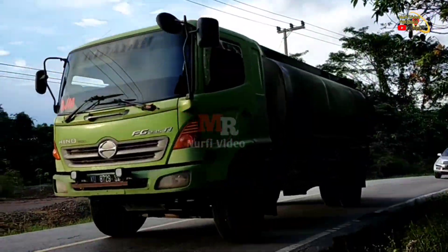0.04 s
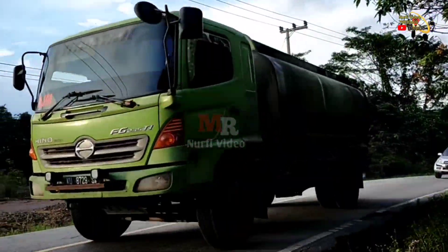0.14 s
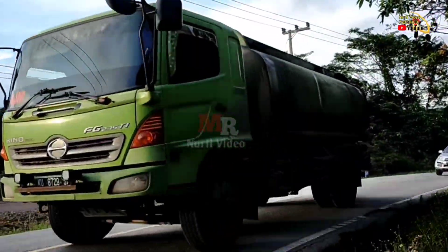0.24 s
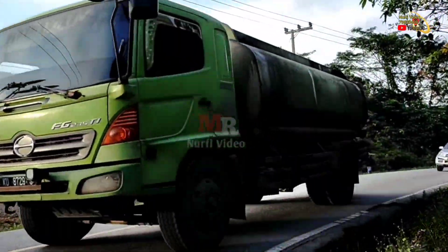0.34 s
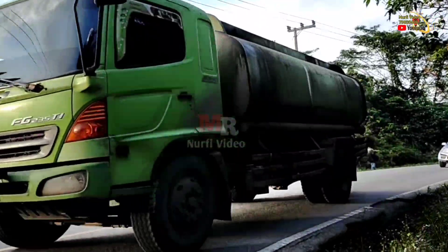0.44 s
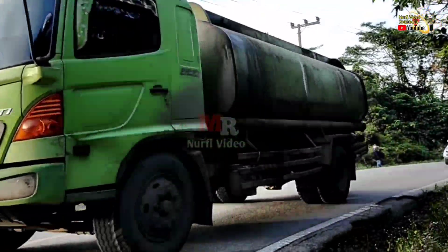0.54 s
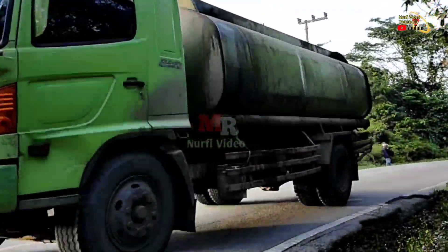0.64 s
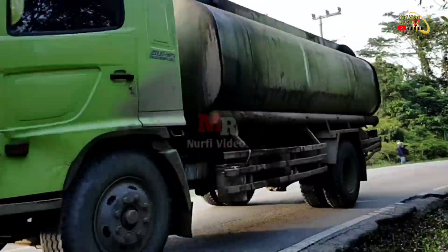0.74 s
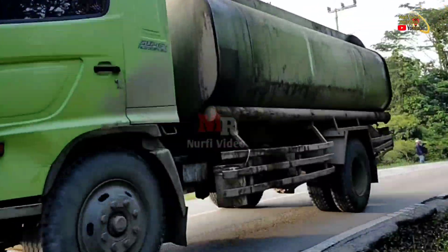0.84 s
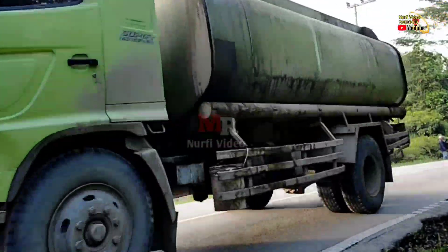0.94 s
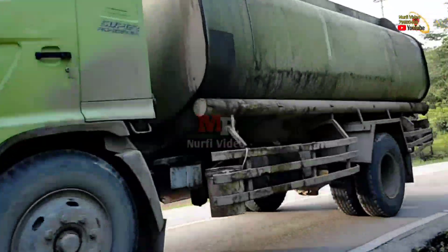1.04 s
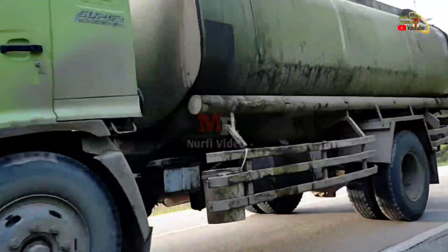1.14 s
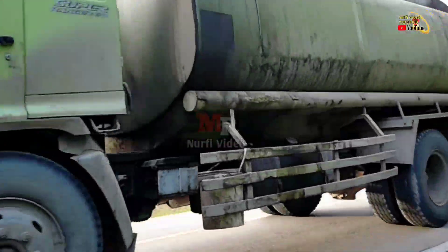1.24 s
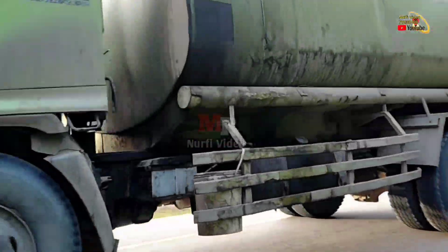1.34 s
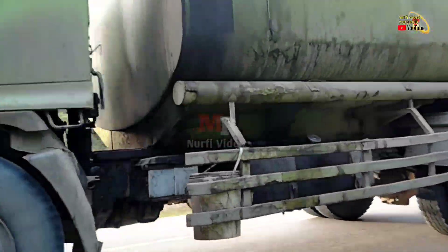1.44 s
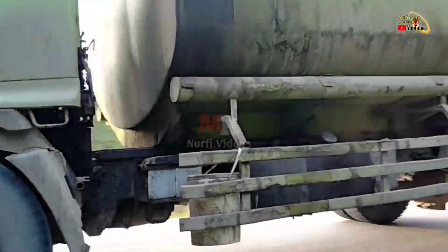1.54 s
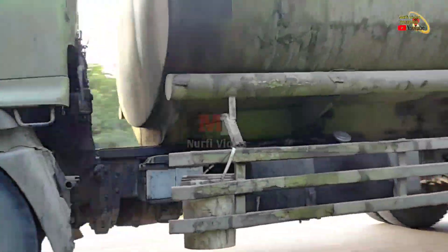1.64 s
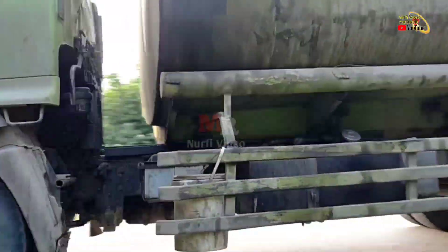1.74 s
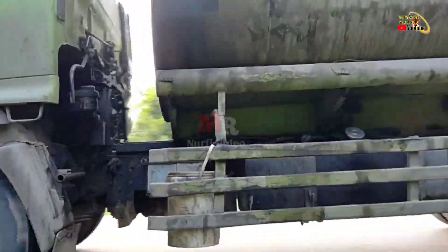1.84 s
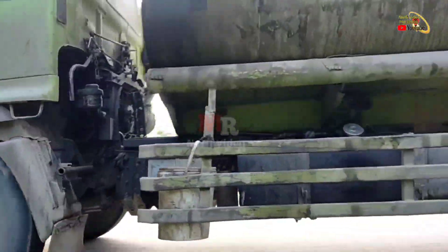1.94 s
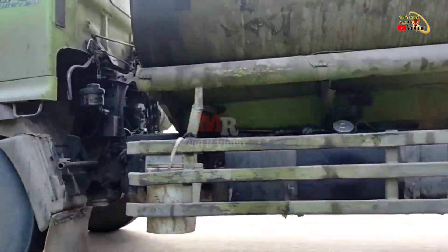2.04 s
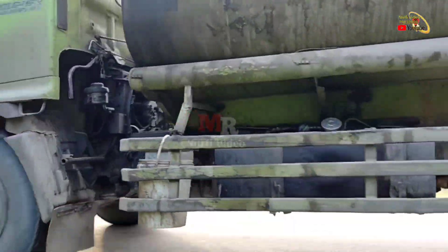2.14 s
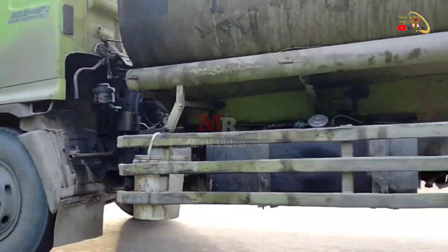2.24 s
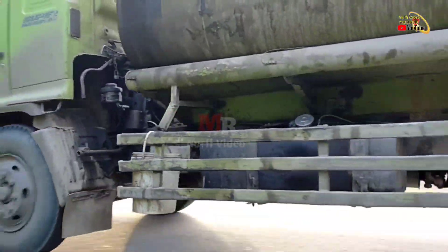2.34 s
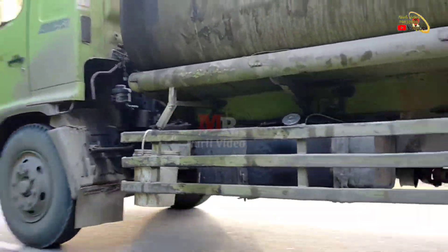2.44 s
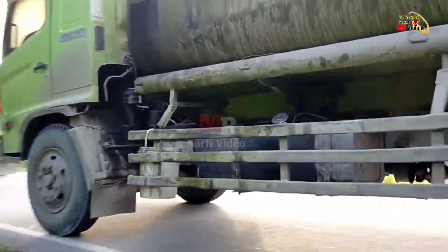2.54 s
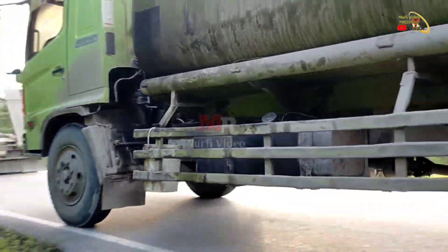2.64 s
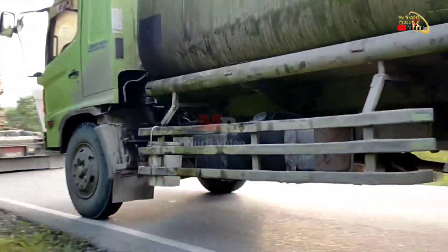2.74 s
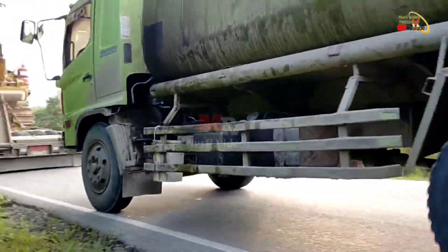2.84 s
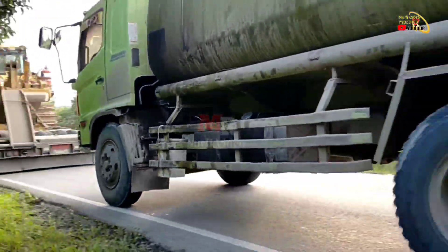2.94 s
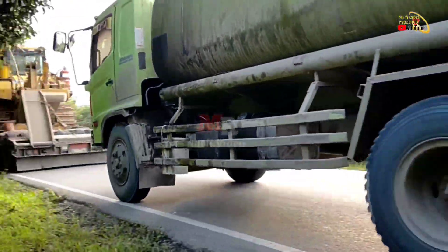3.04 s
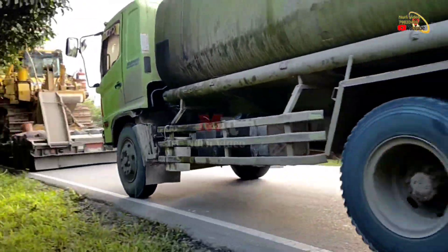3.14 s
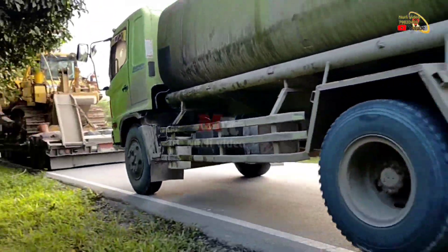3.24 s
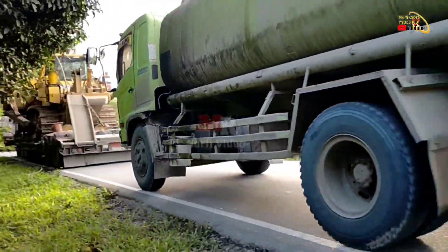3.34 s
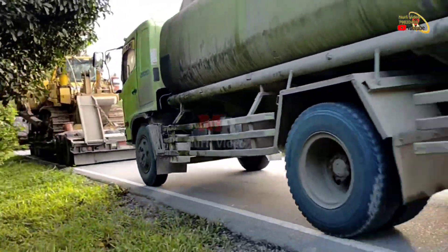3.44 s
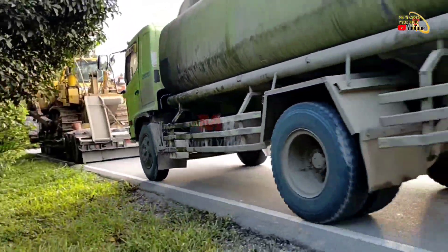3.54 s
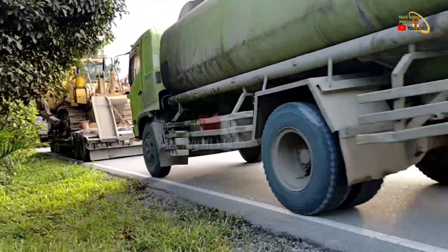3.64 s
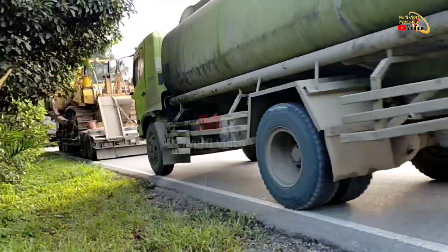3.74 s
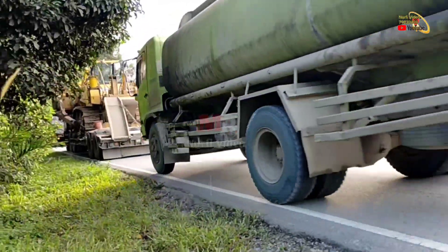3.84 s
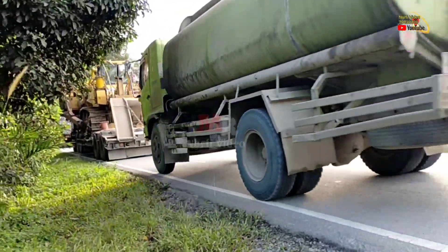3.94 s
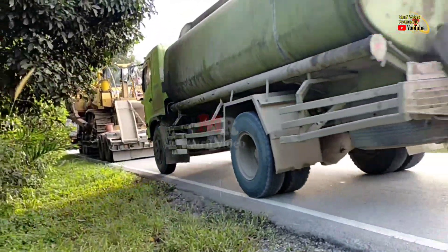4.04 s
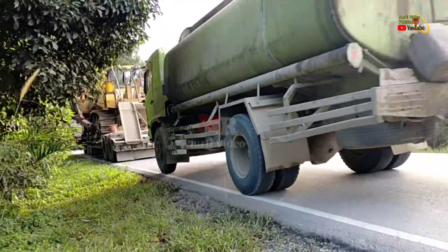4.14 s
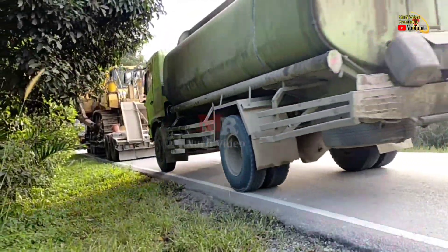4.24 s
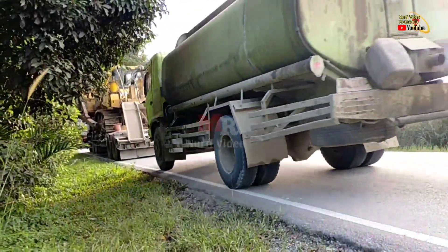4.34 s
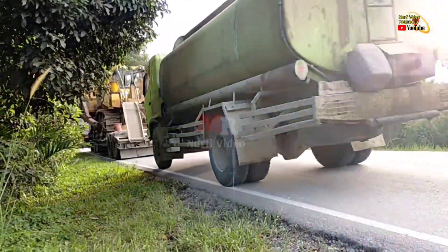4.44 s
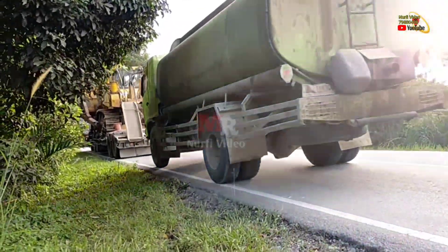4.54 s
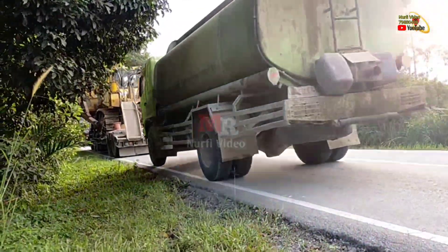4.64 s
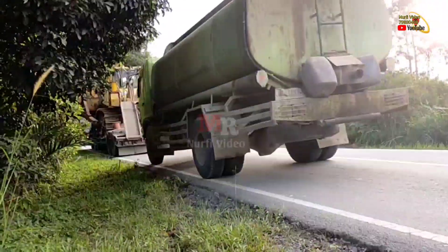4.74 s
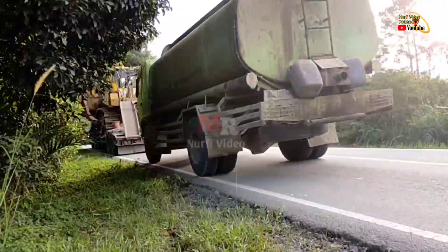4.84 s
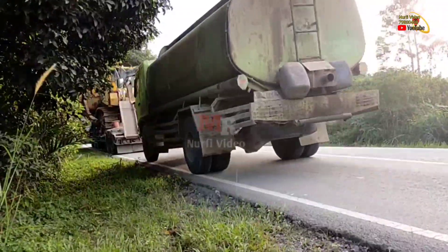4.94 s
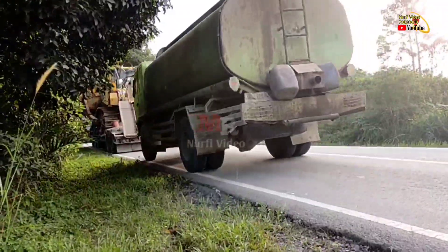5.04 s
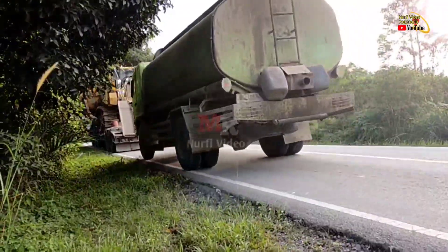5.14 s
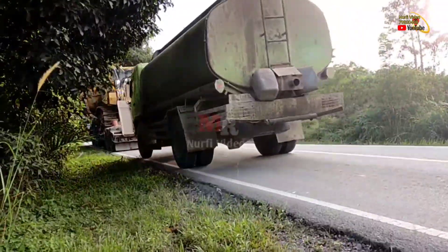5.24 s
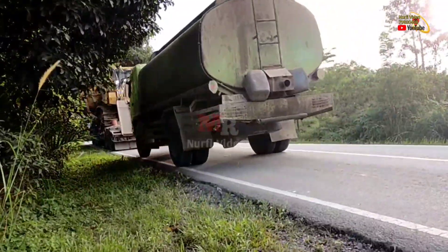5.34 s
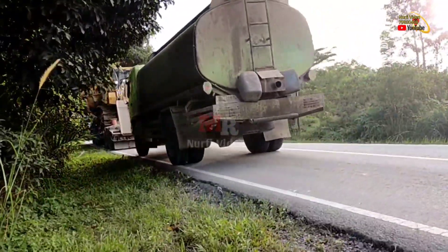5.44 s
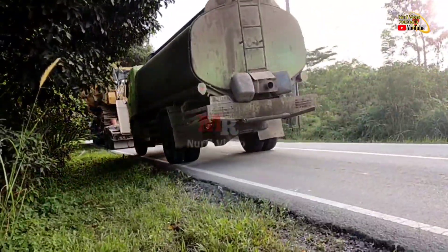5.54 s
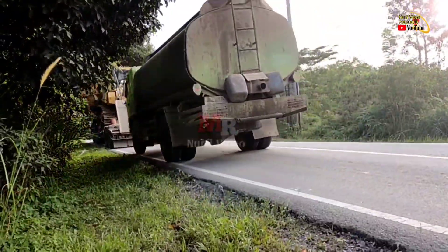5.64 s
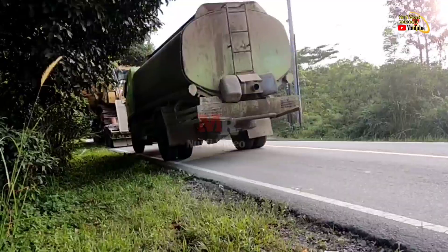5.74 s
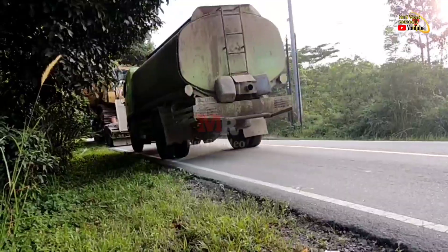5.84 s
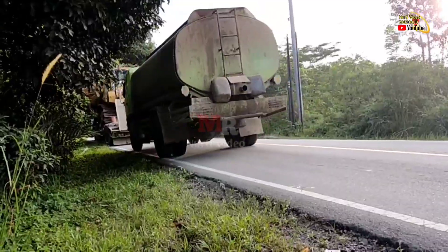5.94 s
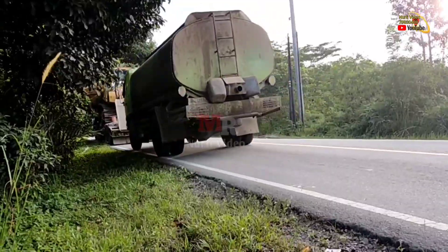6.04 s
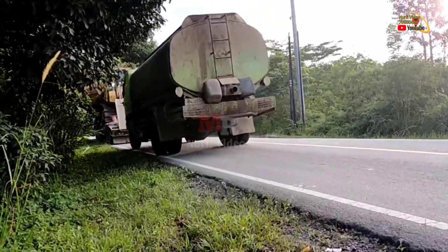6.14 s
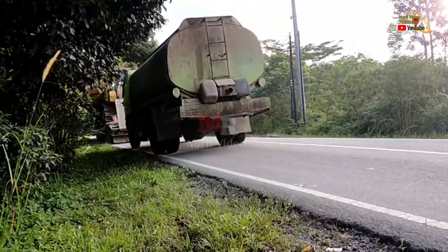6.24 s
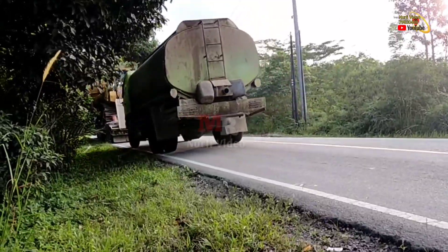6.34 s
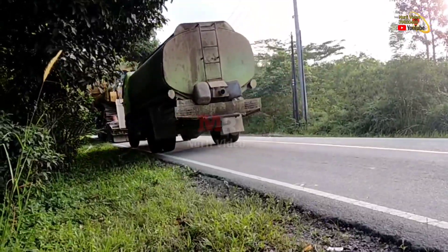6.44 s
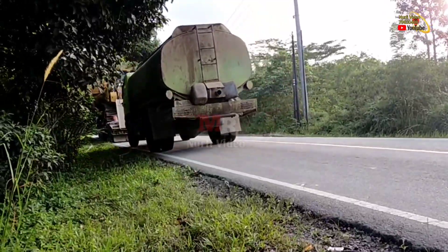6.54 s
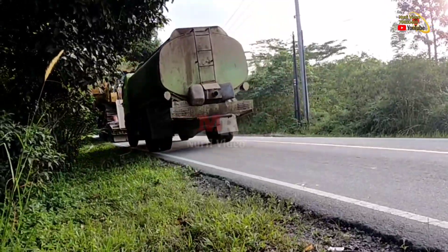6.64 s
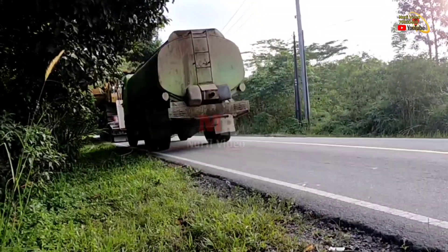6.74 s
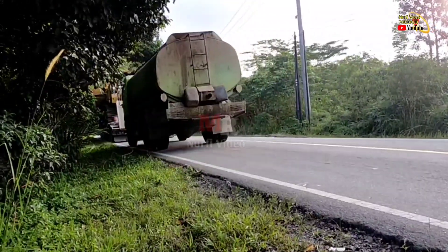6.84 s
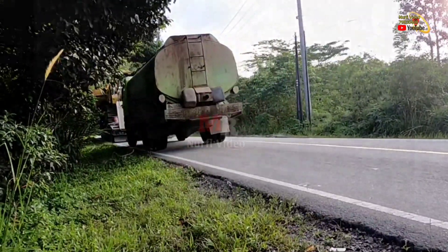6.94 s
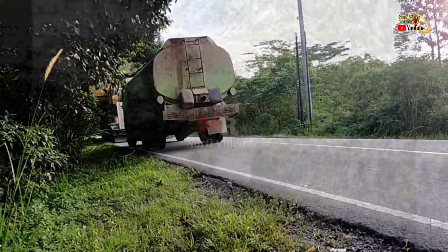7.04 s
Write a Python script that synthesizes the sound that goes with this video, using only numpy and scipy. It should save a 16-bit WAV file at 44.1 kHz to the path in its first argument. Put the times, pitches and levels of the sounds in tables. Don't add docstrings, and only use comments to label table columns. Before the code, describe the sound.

A heavy diesel tanker grinds slowly past at the roadside, droning and clattering with faint brake squeals, then recedes with a stone snap and air hiss.

```python
import sys
import numpy as np
from scipy import signal
from scipy.fft import rfft, irfft, next_fast_len
from scipy.io import wavfile

SR = 44100
rng = np.random.default_rng(int(sys.argv[2]) if len(sys.argv) > 2 else 0)


def file_out(sig):
    cols = np.atleast_2d(sig).T
    lim = np.clip(cols, -1, 1)
    pcm = np.round(lim * 32767).astype(np.int16)
    wavfile.write(sys.argv[1], SR, pcm)


def volts_from_decibels(level):
    exponent = np.asarray(level, float) / 20
    return 10 ** exponent


N = 311787


def rms_one(x):
    return x / np.sqrt(np.mean(x ** 2) + 1e-20)


def in_time(rows):
    s, *columns = np.transpose(rows)
    return [np.interp(np.arange(N) / SR, s, column) for column in columns]


def window(rows):
    t = np.arange(N) / SR
    return volts_from_decibels(in_time(rows)[-1]) * ((t > rows[0][0]) & (t < rows[-1][0]))


def at_hz(points, hz):
    f, db = np.transpose(points)
    return np.interp(np.log(hz + 1e-9), np.log(f), db, left=-200, right=-200)


def drift(rate_hz):
    r = np.exp(-80 * np.pi * rate_hz / SR)
    steps = rng.standard_normal(N // 40 + 2002)
    slow = signal.lfilter([1], [1, -2 * r, r * r], steps)[2000:]
    return np.interp(np.arange(N) / 40, np.arange(len(slow)), rms_one(slow))


def tone(turns, db, wobble_db=0.):
    return np.sqrt(2) * volts_from_decibels(db + wobble_db * drift(3.5)) * np.cos(2 * np.pi * turns)


def ring(clicks, hz, t60_s):
    r, w = volts_from_decibels(-60 / (t60_s * SR)), 2 * np.pi * hz / SR
    return signal.lfilter([0, np.sin(w)], [1, -2 * r * np.cos(w), r * r], clicks + 1e-18)


def blow(s, db, hz, t60_s):
    click = np.zeros(N)
    click[round(s * SR)] = volts_from_decibels(db)
    return ring(click, hz, t60_s)


def noise(near, far, distance, patchy_db):
    size = next_fast_len(N)
    hz = np.arange(size // 2 + 1) * SR / size
    coloured = rfft(rng.standard_normal(size)) * volts_from_decibels(at_hz(near, hz))
    thirds = 3 * np.log2(hz + 1e-9)
    together = drift(2.2)
    flickers = [drift(9.6) for _ in range(3)]
    out, power = 0, 0
    for k in range(int(3 * np.log2(near[0][0])), int(3 * np.log2(near[-1][0])) + 2):
        band = coloured * np.clip(1 - abs(thirds - k), 0, 1)
        centre_hz = np.clip(2 ** (k / 3), far[0][0], far[-1][0])
        change_db = np.clip(at_hz(far, centre_hz) - at_hz(near, centre_hz), -15, 15)
        tilt = volts_from_decibels(distance * change_db)
        power = power + tilt ** 2 * np.sum(abs(band) ** 2) * 2 / size ** 2
        flicker = 0.42 * together + np.roll(flickers[k % 3], 9001 * k)
        out = out + irfft(band, size)[:N] * tilt * volts_from_decibels(patchy_db * flicker)
    return .816 * out / np.sqrt(power)


# time in seconds, tanker in Hz, low-loader in Hz.
FIRING_HZ = [(0.0, 62.81, 74.25), (0.24, 63.96, 71.41), (0.49, 63.27, 72.43), (0.73, 63.18, 70.51),
             (0.98, 62.18, 70.32), (1.22, 62.27, 69.98), (1.46, 61.66, 69.23), (1.71, 61.23, 68.75),
             (1.95, 60.9, 68.32), (2.19, 59.95, 67.91), (2.44, 59.85, 67.42), (2.68, 58.41, 65.43),
             (2.93, 58.21, 65.92), (3.17, 57.54, 63.8), (3.41, 57.25, 63.59), (3.66, 56.43, 62.45),
             (3.9, 55.63, 61.44), (4.14, 54.53, 61.39), (4.39, 53.53, 59.85), (4.63, 51.92, 60.22),
             (4.88, 51.41, 58.62), (5.12, 50.45, 60.24), (5.36, 49.69, 58.53), (5.61, 48.97, 60.42),
             (5.85, 48.55, 59.75), (6.09, 47.95, 60.24), (6.34, 47.7, 60.98), (6.58, 47.83, 59.79),
             (6.83, 46.77, 60.45), (7.07, 47.41, 60.22)]
START_TURNS = (-.178, -.256)


def engine_turns():
    return [np.cumsum(hz) / SR + start for hz, start in zip(in_time(FIRING_HZ), START_TURNS)]


# time in seconds, tanker, its octave, low-loader, its octave in dB.
EXHAUST_DB = [(0.0, -20.7, -35.7, -21.0, -50), (0.24, -20.7, -35.7, -21.4, -54.2),
              (0.49, -20.2, -34.4, -19.0, -44.5), (0.73, -19.6, -36.4, -21.2, -48.3),
              (0.98, -18.8, -34.7, -21.6, -42.3), (1.22, -17.8, -31.4, -22.4, -49.2),
              (1.46, -16.7, -32.7, -22.9, -42.6), (1.71, -16.5, -31.5, -22.8, -36.1),
              (1.95, -16.1, -30.2, -24.1, -35.7), (2.19, -16.8, -26.3, -23.9, -45.2),
              (2.44, -16.4, -33.6, -23.5, -36.1), (2.68, -15.7, -29.7, -27.4, -42.4),
              (2.93, -15.3, -34.8, -26.9, -36.1), (3.17, -15.5, -32.7, -26.7, -36.6),
              (3.41, -16.7, -35.0, -25.3, -37.4), (3.66, -18.0, -30.3, -25.5, -36.3),
              (3.9, -20.6, -35.0, -25.1, -40.4), (4.14, -23.6, -33.7, -25.9, -40.4),
              (4.39, -26.0, -37.1, -27.1, -36.2), (4.63, -26.4, -34.3, -27.5, -38.3),
              (4.88, -27.1, -33.1, -26.0, -42.8), (5.12, -26.7, -36.3, -26.2, -39.2),
              (5.36, -29.0, -36.6, -26.9, -36.3), (5.61, -29.5, -40.7, -26.0, -40.0),
              (5.85, -31.3, -38.1, -26.4, -46.6), (6.09, -33.3, -38.7, -26.1, -43.5),
              (6.34, -34.4, -39.0, -25.8, -41.0), (6.58, -33.5, -41.1, -28.0, -44.4),
              (6.83, -35.6, -38.9, -31.3, -40.5), (7.07, -37.3, -38.1, -30.7, -41.3)]
# multiple of firing rate, level in dB.
MINOR_ORDERS = [(1.5, -13), (3, -9), (4, -9.5)]


def exhaust_drones(tanker, loader):
    tanker_db, tanker_octave_db, loader_db, loader_octave_db = in_time(EXHAUST_DB)
    out = tone(tanker, tanker_db) + tone(2 * tanker + 0.25, tanker_octave_db)
    out += tone(loader, loader_db) + tone(2 * loader, loader_octave_db)
    for multiple, db in MINOR_ORDERS:
        out += tone(multiple * tanker, tanker_db - 17 + db, wobble_db=5.0)
    return out


# time in seconds, blade rate in Hz, blade level in dB, belt level in dB.
FAN_CURVE = [(0, 198, -53, -48), (.6, 195.3, -38.5, -48), (1, 194.5, -38.5, -39), (1.5, 190.5, -37.5, -50),
             (2, 188, -34.5, -29), (2.4, 186, -38, -32), (3, 180.6, -42, -47), (3.6, 177.7, -38, -37),
             (4.2, 170.5, -39, -38), (4.8, 164.8, -49, -50), (5.5, 153.3, -48, -65), (7.07, 148, -61, -60)]


def cooling_fan():
    blade_hz, blade_db, belt_db = in_time(FAN_CURVE)
    blades = np.cumsum(blade_hz) / SR
    return tone(blades, blade_db, wobble_db=2.0) + tone(.702 * blades, belt_db, wobble_db=-0.5)


# time in seconds, note in dB, its octave in dB.
WAITING_DB = [(0, -54, -57), (1.8, -38, -45), (2.25, -36, -58), (2.45, -45, -28), (2.7, -52, -37),
              (3.2, -39, -51.5), (4.2, -52, -61), (4.6, -36, -55), (7.07, -41.5, -52.5)]


def waiting_diesel():
    note_db, octave_db = in_time(WAITING_DB)
    turns = 117.1 * np.arange(N) / SR
    return tone(turns, note_db, wobble_db=5.0) + tone(2 * turns, octave_db)


# time in seconds, rumble, clatter, hiss in dB.
NOISE_DB = [(0.0, -32, -27.5, -41), (0.41, -32.5, -28, -40.5), (0.75, -29, -26.5, -40),
            (0.9, -31.5, -26, -39), (1.22, -30, -26, -38.5), (1.69, -31.5, -25, -39),
            (1.97, -30, -24, -38.5), (2.17, -33, -26, -41), (2.44, -29, -27, -41), (2.6, -29.5, -28, -42.5),
            (3.25, -32.5, -30, -46.5), (3.54, -32, -32, -48), (3.84, -34.5, -33.5, -49),
            (4.31, -33.5, -35.5, -50.5), (4.84, -35, -36.5, -51.5), (5.4, -34.5, -36.5, -50),
            (5.85, -35, -37.5, -51), (6.24, -34.5, -38, -51.5), (6.59, -35, -39.5, -52.5),
            (7.07, -36, -39.5, -51)]
# time in seconds, distance from 0 near to 1 far.
DISTANCE_CURVE = [(0, 0.46), (.7, 0.15), (1.5, 0), (2.3, 0), (3, 0.42), (4, 0.95), (5, 1.0), (7.07, 1.0)]


def passing():
    return *in_time(NOISE_DB), np.clip(in_time(DISTANCE_CURVE)[0], 0, 1.3)


# frequency in Hz, density in dB per Hz.
RUMBLE_NEAR = [(20, -16), (35, 2), (50, -7), (90, -3), (140, -0.5), (200, -6.5), (250, -9), (340, -2.5),
               (450, -20.5), (560, -26)]
RUMBLE_DISTANT = [(20, -16), (50, -3.5), (140, -2), (200, -7.5), (280, -13.5), (400, -18), (560, -38)]


def road_rumble(rumble_db, distance):
    return volts_from_decibels(rumble_db - 1.0) * noise(RUMBLE_NEAR, RUMBLE_DISTANT, distance, patchy_db=1.0)


TANKER_EXCESS = [.9, -.5, .2, -1.0, .7, -.3]
LOADER_EXCESS = [.6, .3, -.9, .5, -.7, .2]


def uneven_firing(turns, cylinders, wander):
    at = np.flatnonzero(np.diff(np.floor(turns)) > 0)
    chance = rng.standard_normal((len(at) // 6 + 1, 6))
    slow = signal.lfilter([.4], [1, -.9], chance, axis=0)
    excess = np.array(cylinders) + wander * slow
    excess = excess - excess.mean(axis=1, keepdims=True)
    pulses = np.zeros(N)
    pulses[at] = excess.ravel()[:len(at)]
    return pulses


# time in seconds, level in dB.
TAILPIPE_DB = [(0, -40.5), (1.5, -46), (2.0, -41.5), (2.45, -35), (2.8, -36), (3.2, -40.5), (3.8, -48.5),
               (7.07, -59)]


def lope(tanker, loader, rumble_db):
    own = uneven_firing(tanker, TANKER_EXCESS, wander=0.81)
    both = own + volts_from_decibels(-1.5) * uneven_firing(loader, LOADER_EXCESS, wander=0.73)
    silencer = volts_from_decibels(at_hz(RUMBLE_DISTANT, np.arange(N // 2 + 1) * SR / N))
    silenced = rms_one(irfft(rfft(both) * silencer, N))
    pipe_hz, pipe_t60_s = 331, 0.037
    pipe = rms_one(ring(ring(own, pipe_hz, pipe_t60_s), pipe_hz, pipe_t60_s))
    return volts_from_decibels(rumble_db - 1.5) * silenced + volts_from_decibels(in_time(TAILPIPE_DB)[0]) * pipe


def firing_gate(turns, depth):
    strength = np.array([1.0, 0.3, 0.69, 0.6, 0.89, .7])
    cylinder = np.floor(turns + .5).astype(int) % 6
    return rms_one(1 + depth * strength[cylinder] * np.cos(2 * np.pi * turns))


# mode in Hz, level in dB, t60 in seconds.
BLOCK_MODES = [(684, 1, 0.053), (763, -3, 0.075), (940, 1.5, 0.042), (1121, -3, 0.042), (1318, 2.5, 0.033),
               (1716, -5, 0.022), (2070, -2, .025)]


def knock(turns):
    at = np.flatnonzero(np.diff(np.floor(turns)) > 0)
    out = np.zeros(N)
    for hz, db, t60_s in BLOCK_MODES:
        late = rng.integers(0, 220, len(at))
        force = volts_from_decibels(db + 2.85 * rng.standard_normal(len(at))) * rng.choice([-1, 1], len(at))
        clicks = np.zeros(N)
        clicks[np.minimum(at + late, N - 1)] = force
        out += ring(clicks, hz, t60_s)
    return rms_one(out)


# frequency in Hz, density in dB per Hz.
CLATTER_NEAR = [(260, -22), (450, -6), (570, -9.5), (675, -4.5), (835, -3), (964, -2), (1320, -3.5),
                (1520, -6), (2190, -6.5), (2710, -14), (3400, -19), (4420, -30), (7480, -120)]
CLATTER_DISTANT = [(260, -33), (450, -13.5), (575, -7.5), (675, -1), (787, -5), (863, -9.5), (1950, -10.5),
                   (2620, -18), (3400, -30), (4420, -25), (7480, -120)]


def engine_clatter(tanker, clatter_db, distance):
    rough = noise(CLATTER_NEAR, CLATTER_DISTANT, distance, patchy_db=0.81)
    rough = rough * firing_gate(tanker, depth=0.11)
    return volts_from_decibels(clatter_db - 1.0) * (rough + volts_from_decibels(-7) * knock(tanker))


# frequency in Hz, density in dB per Hz.
HISS_NEAR = [(1760, -42), (3000, -2.5), (4120, -3.5), (4560, -3.5), (4960, -6.5), (6480, -10.5),
             (7340, -3.5), (7970, -1.5), (9930, -15.5), (11200, -10.5), (11600, -10.5), (13100, -4),
             (14900, -4.5), (15500, -7)]
HISS_DISTANT = [(1760, -21), (3000, 0), (3610, -7.5), (4060, -8.5), (4690, -12), (5170, -9), (6900, -11.5),
                (7860, -3.5), (8590, -9.5), (9270, -15), (11800, -15.5), (14600, -8), (15500, -15)]


def air_hiss(tanker, hiss_db, distance):
    air = noise(HISS_NEAR, HISS_DISTANT, distance, patchy_db=0.89)
    return volts_from_decibels(hiss_db + 3.0) * air * firing_gate(tanker, depth=0.1)


# (time in seconds, level in dB).
SQUEAL_BANDS = [
    (11890, 150, [(0.6, -56), (0.712, -57), (0.822, -51), (0.892, -57), (1.044, -48), (1.106, -50), (1.13, -46), (1.276, -49), (1.3, -44), (1.356, -55), (1.418, -54), (1.432, -51), (1.536, -53), (1.566, -49), (1.612, -55), (1.916, -51), (2.3, -59)]),
    (12750, 400, [(.7, -75), (.9, -54), (1.3, -54), (1.45, -50), (2.0, -50), (2.25, -56), (2.4, -75)]),
    (4450, 90, [(1.1, -75), (1.13, -49), (1.22, -49), (1.25, -62), (1.31, -62), (1.33, -47), (1.37, -49), (1.44, -75)]),
    (3800, 80, [(1.0, -75), (1.2, -54), (1.45, -51), (1.6, -56), (1.8, -75)]),
    (8090, 200, [(.4, -75), (.6, -54), (1.1, -49), (1.5, -54), (1.9, -52), (2.3, -75)]),
    (9900, 500, [(5.16, -75), (5.22, -56), (5.44, -55), (5.47, -75)]),
    (1165, 70, [(4.6, -75), (4.85, -51), (5.25, -49), (5.7, -52), (5.9, -75)]),
]


def squeals():
    out, white = np.zeros(N), rng.standard_normal(N)
    for hz, width_hz, rows in SQUEAL_BANDS:
        t60_s = 2.2 / width_hz
        out += window(rows) * rms_one(ring(ring(white, hz, t60_s), hz, t60_s))
    return out


# time in seconds, peak in dB, mode in Hz, t60 in seconds.
RATTLE_HITS = [(1.306, -18, 1100, 0.028), (1.422, -16.5, 1460, .03), (1.523, -19, 1020, 0.027),
               (1.551, -19, 1210, 0.035), (1.871, -19, 2200, .03), (2.042, -33, 1200, .03),
               (2.379, -23, 1494, .03), (3.226, -30, 900, 0.029), (4.08, -29, 1270, 0.11),
               (4.14, -25, 654, .08), (4.24, -26, 690, .06), (4.682, -30, 700, 0.068),
               (5.96, -30, 705, .08)]


def rattles():
    out = np.zeros(N)
    for s, db, hz, t60_s in RATTLE_HITS:
        out += blow(s, db - 1, hz, t60_s)
        out += blow(s + 0.00406, db - 5, 1.09 * hz, t60_s)
    return out


# time in seconds, peak in dB, thud in Hz, t60 in seconds, crack in dB.
STONE_SNAP = (5.0484, -10.5, 1300, .0034, -23)


def stone():
    s, db, hz, t60_s, crack_db = STONE_SNAP
    crack = blow(s, crack_db, 13500, .0012) + blow(s, crack_db - 5, 7800, .0015)
    return blow(s, db, hz, t60_s) + crack


# time in seconds, level in dB.
VALVE_DB = [
    (5.13, -61),
    (5.132, -56),
    (5.144, -64),
    (5.152, -53),
    (5.216, -44),
    (5.332, -40.5),
    (5.584, -47.5),
    (5.68, -57),
]
# frequency in Hz, density in dB per Hz.
VALVE_SPECTRUM = [(2350, -46), (4000, -22), (5250, -16), (5620, -15), (6700, -13), (7730, 1), (9010, -11),
                  (9920, -5), (11200, -5), (14100, 1.5), (15500, -6)]


def air_valve():
    return window(VALVE_DB) * noise(VALVE_SPECTRUM, VALVE_SPECTRUM, 0, patchy_db=-0.1)


# time in seconds, whistle centre in Hz, whistle in dB, broad jet in dB.
LEAK_CURVE = [(5.6, 14200, -75, -75), (5.9, 14040, -58, -64), (6.2, 13550, -54, -55),
              (6.45, 13600, -47, -56), (6.65, 13460, -53, -55), (6.8, 13200, -62, -52),
              (7.07, 12900, -66, -52)]
# frequency in Hz, density in dB per Hz.
JET_SPECTRUM = [(10500, -20), (12000, -6), (13500, 0), (15000, -2), (15700, -6)]


def turbo_leak():
    centre_hz, whistle_db, broad_db = in_time(LEAK_CURVE)
    lowpass = signal.butter(2, 500, fs=SR, output="sos")
    low = signal.sosfilt(lowpass, rng.standard_normal((2, N)))
    phase = 2 * np.pi * np.cumsum(centre_hz + 120 * drift(8)) / SR
    whistle = rms_one(low[0] * np.cos(phase) + low[1] * np.sin(phase))
    whistle = whistle * volts_from_decibels(whistle_db - broad_db + 3.5 * drift(30))
    return window(LEAK_CURVE) * (whistle + noise(JET_SPECTRUM, JET_SPECTRUM, 0, patchy_db=3.0))


def scene():
    tanker, loader = engine_turns()
    rumble_db, clatter_db, hiss_db, distance = passing()
    out = exhaust_drones(tanker, loader) + cooling_fan() + waiting_diesel()
    out += road_rumble(rumble_db, distance) + lope(tanker, loader, rumble_db)
    out += engine_clatter(tanker, clatter_db, distance) + air_hiss(tanker, hiss_db, distance)
    out += squeals() + rattles() + stone() + air_valve() + turbo_leak()
    return out[None]


def band_limit(x):
    return signal.sosfilt(signal.butter(12, 15680, fs=SR, output="sos"), x)


def record(dry):
    top_cut = signal.ellip(12, .3, 70, 15500, fs=SR, output="sos")
    mix = signal.sosfilt(top_cut, dry)
    return band_limit(mix)


dry = scene()
out = record(dry)
file_out(out)
```